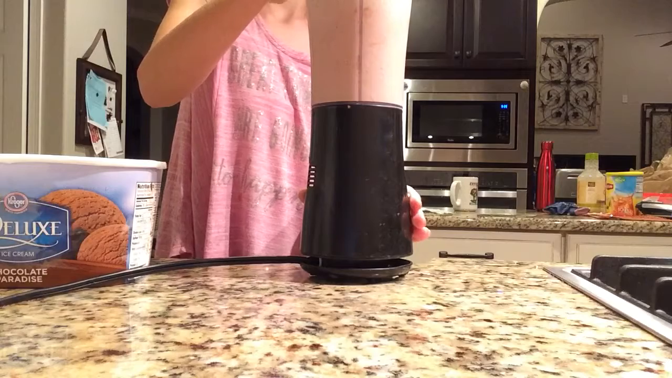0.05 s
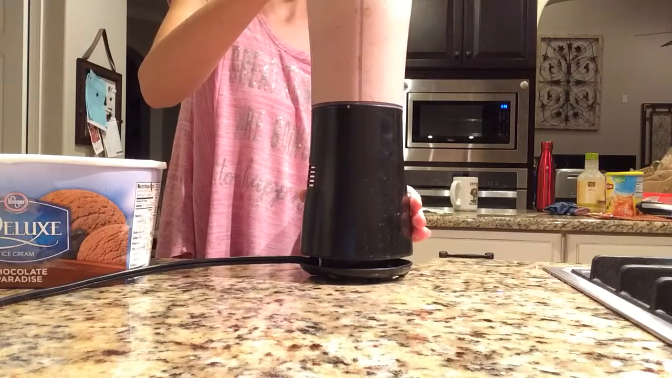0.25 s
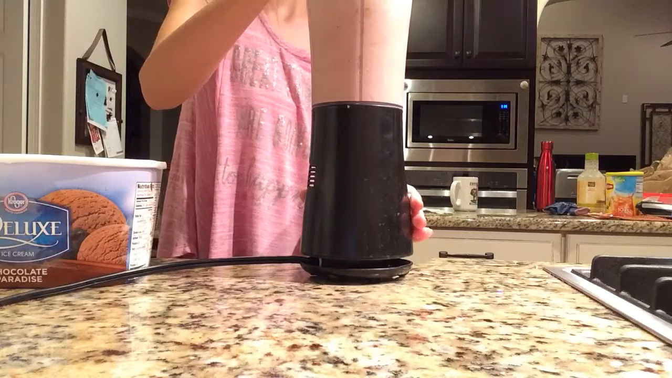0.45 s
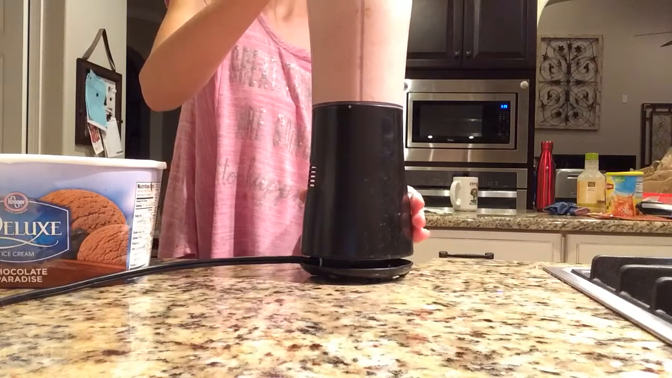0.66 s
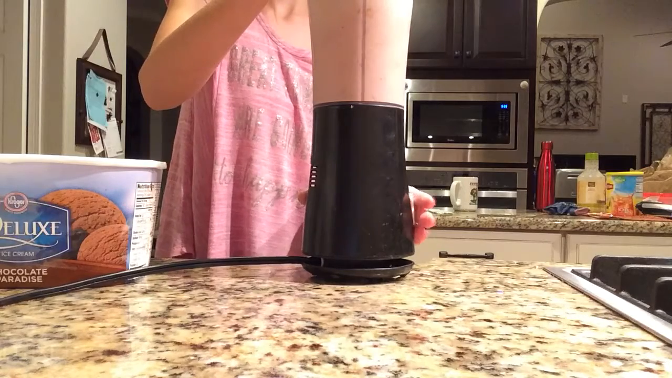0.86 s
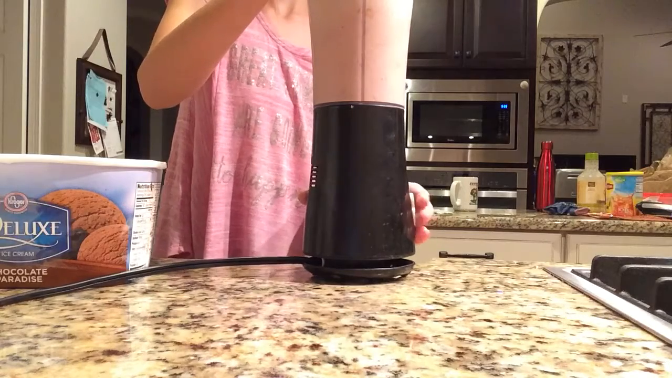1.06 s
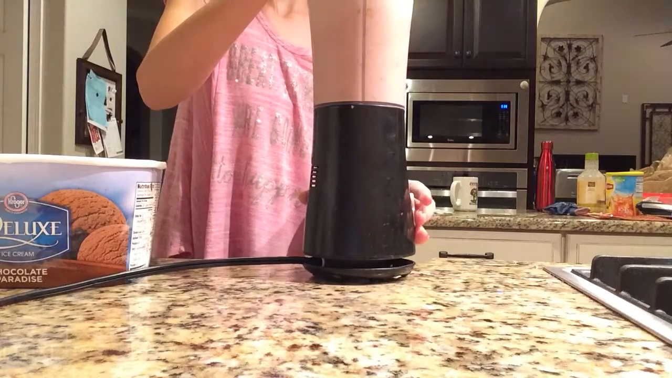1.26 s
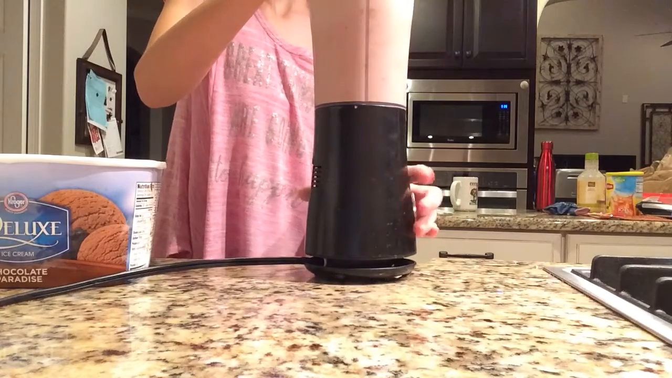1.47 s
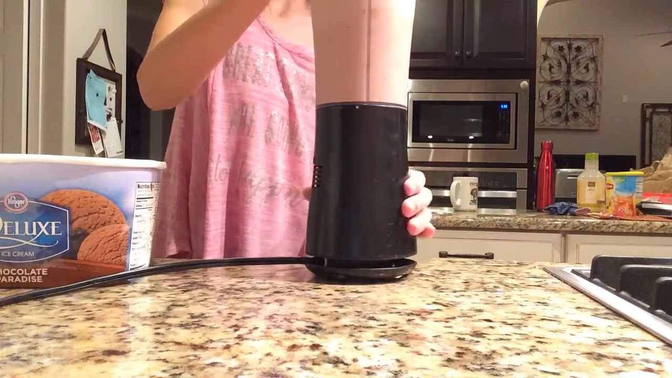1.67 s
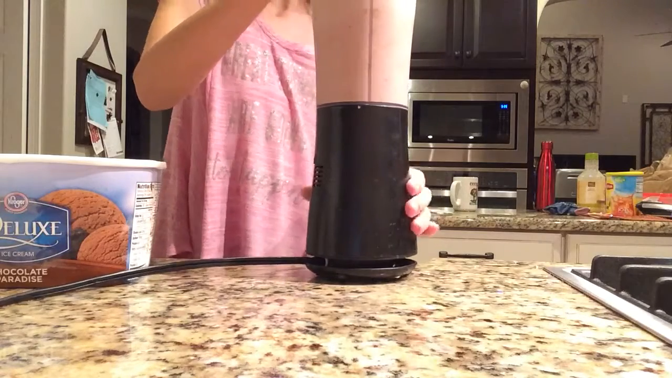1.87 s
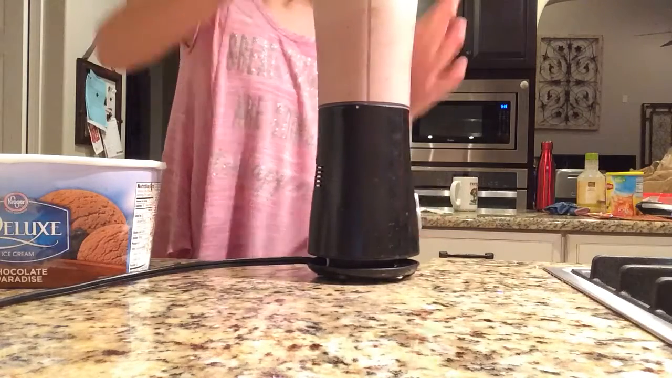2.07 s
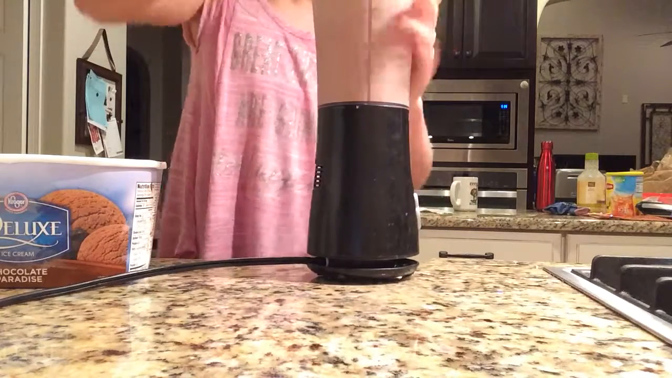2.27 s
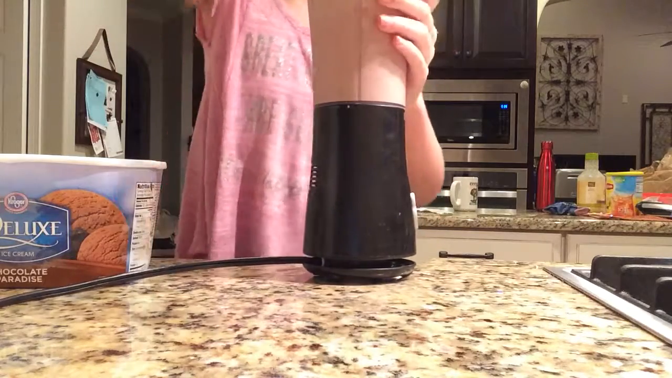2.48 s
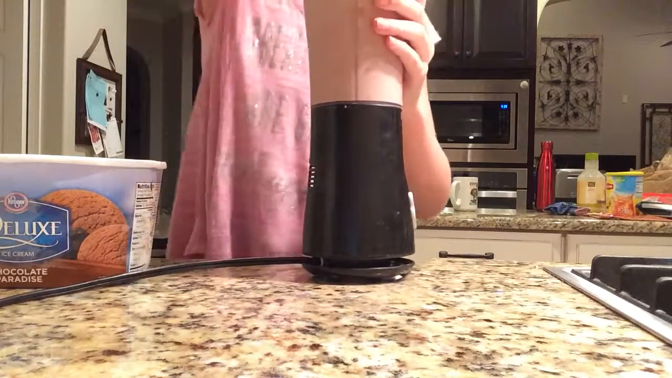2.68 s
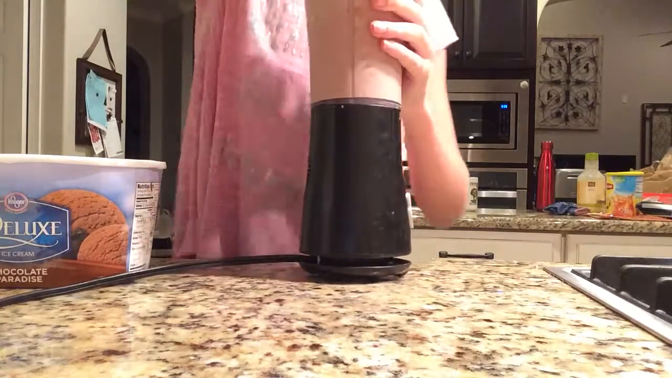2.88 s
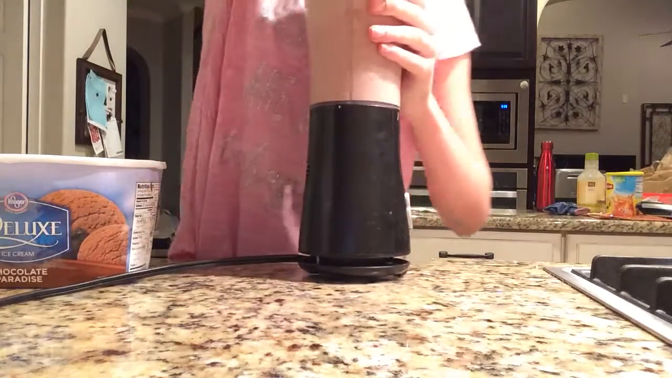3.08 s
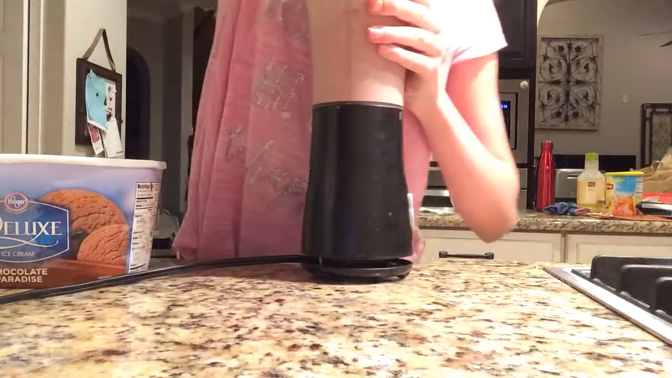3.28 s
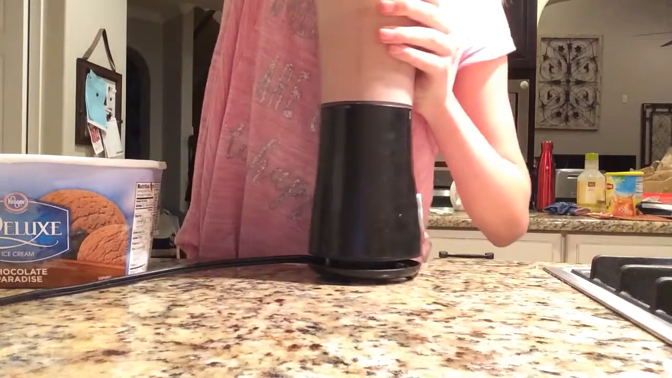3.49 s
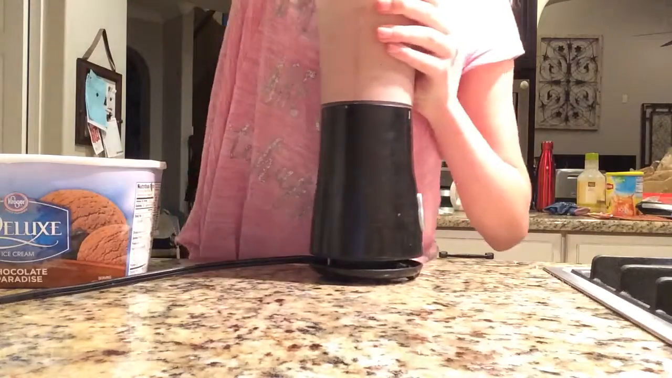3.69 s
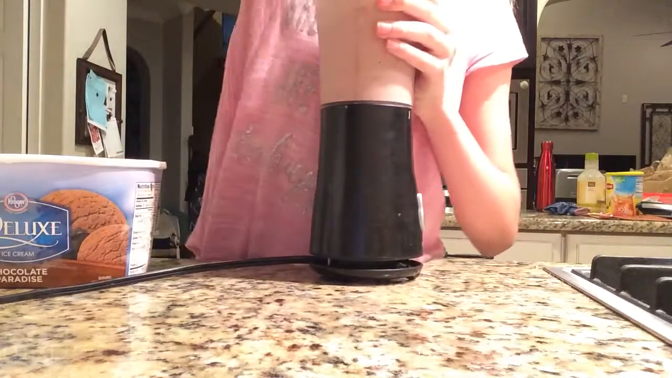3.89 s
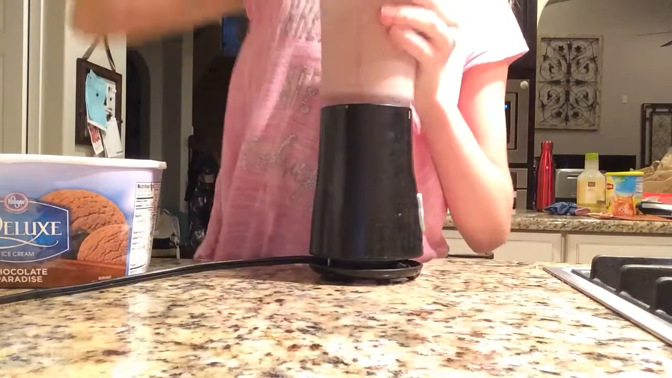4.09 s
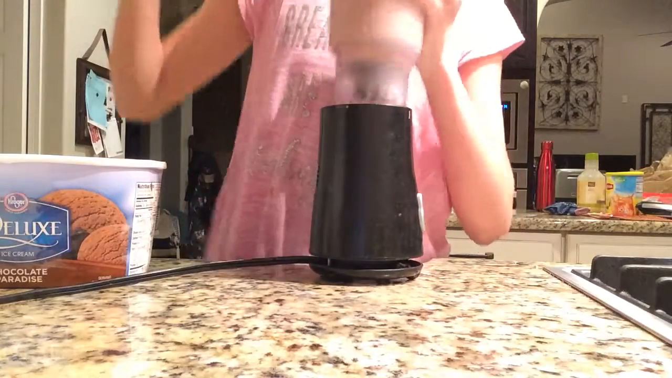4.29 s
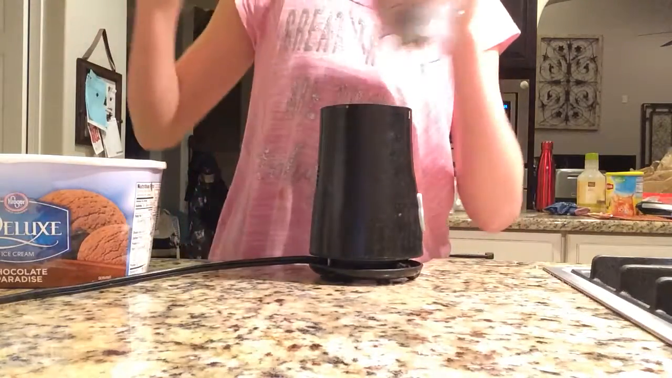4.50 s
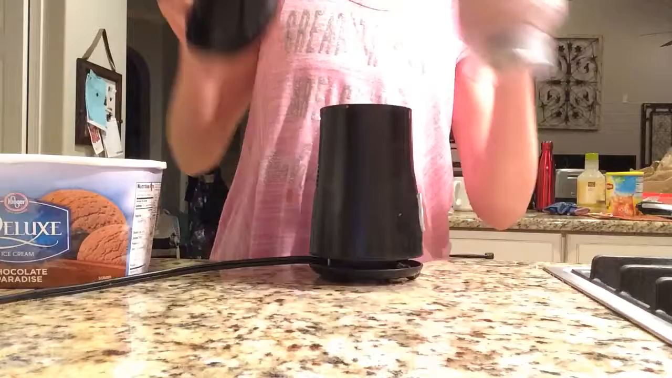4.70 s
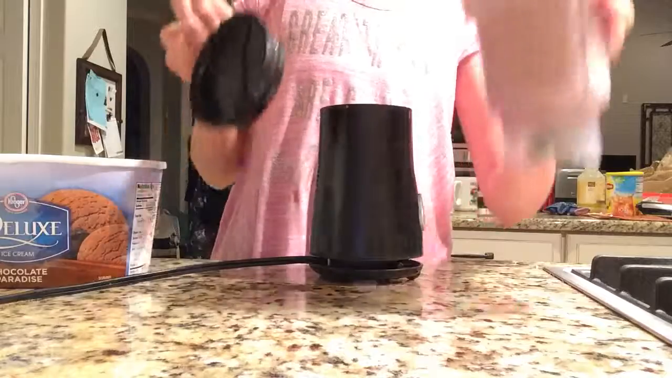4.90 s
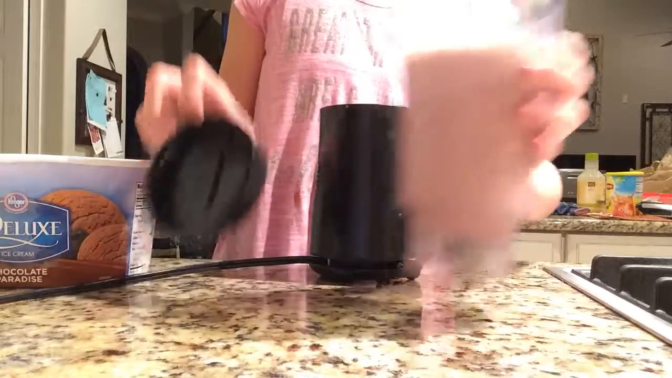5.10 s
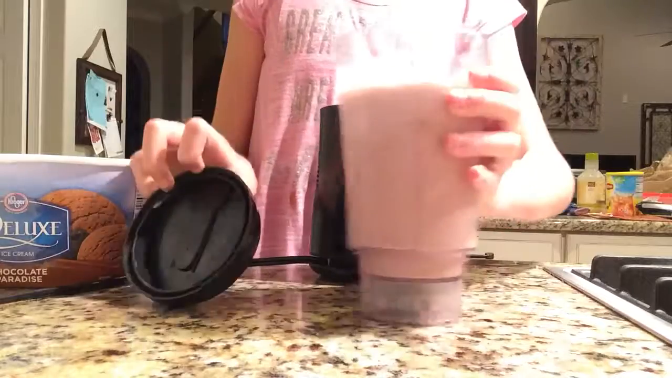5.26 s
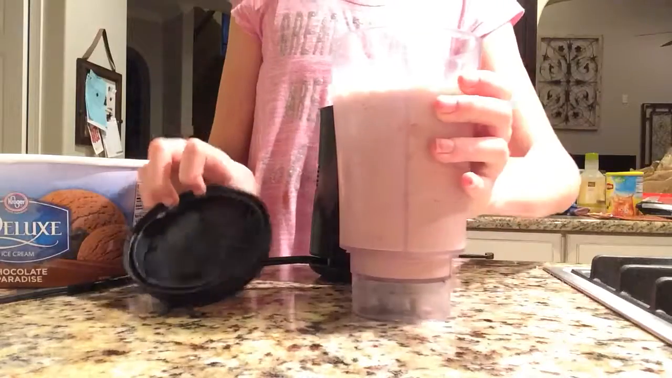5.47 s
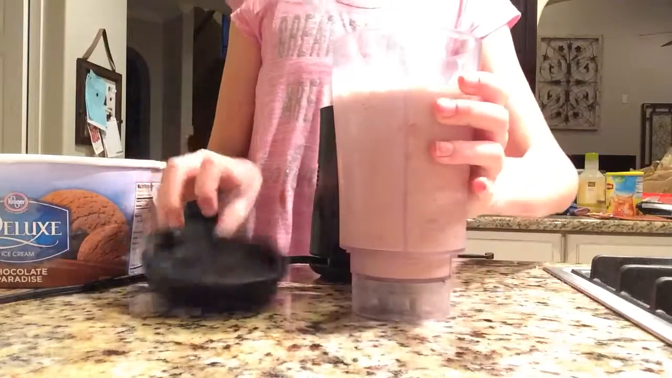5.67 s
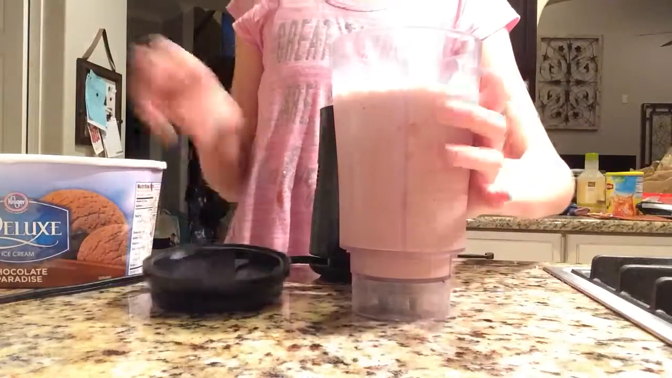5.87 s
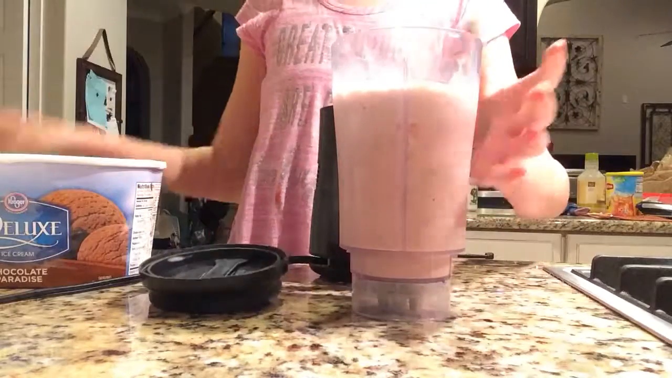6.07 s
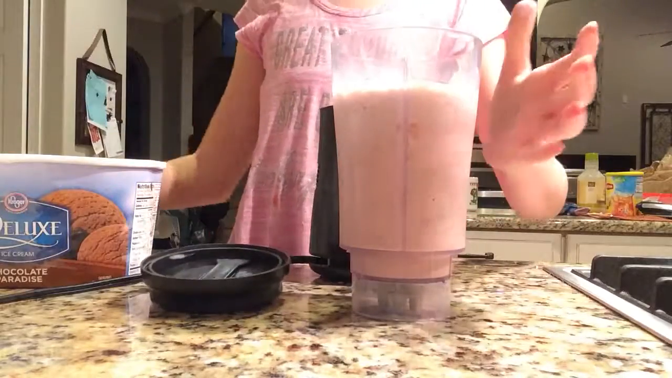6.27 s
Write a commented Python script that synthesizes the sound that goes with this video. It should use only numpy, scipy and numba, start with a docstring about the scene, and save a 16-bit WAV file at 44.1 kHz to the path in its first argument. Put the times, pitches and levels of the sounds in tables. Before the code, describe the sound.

A small blender whirs and winds down while a dog barks in another room, then a plastic cup is twisted off and set down.

```python
"""Blending a drink

A small blender whirs on a stone kitchen counter, is switched off and coasts to a ticking stop.
Its spinning shaft sets the pitch of its hum and whine. A dog barks steadily in another room.
The full plastic cup is twisted off the base and its blade lid is pulled free with a snap.
Cup and lid are set down close by; each knock is a mix of fading tones and short bursts of noise."""
import sys
import numpy as np
from scipy import signal
from scipy.fft import rfft, irfft
from scipy.io import wavfile
from scipy.ndimage import uniform_filter1d
from numba import njit

SR = 44100
rng = np.random.default_rng(int(sys.argv[2]) if len(sys.argv) > 2 else 0)


def inscribe(sig):
    """Save sig as 16-bit PCM at rate SR to the path in sys.argv[1].

    A 1-D sig is mono; a 2-D sig holds one channel per row.
    Samples are clipped to [-1, 1] before scaling.
    """
    pcm = np.round(np.clip(np.atleast_2d(sig).T, -1, 1) * 32767)
    wavfile.write(sys.argv[1], SR, pcm.astype(np.int16))


N = 279594
TIME = np.arange(N) / SR
POWER_OFF_S, STOP_S = 0.793, 2.13
MAINS_HZ, TOP_HZ = 60, 15500  # wall current; highest sound kept
POWERED = np.clip((POWER_OFF_S - TIME) / 0.05493 + 1, 0, 1)  # 1 while on, 0 once off
SURGE_PHASE = 2 * np.pi * 2 * MAINS_HZ * TIME  # the current surges twice per cycle


def undb(db):
    """Turn decibels into a gain."""
    return 10 ** (np.asarray(db) / 20)


def unit(x):
    """Scale to an average (rms) level of 1."""
    return x / np.sqrt(np.mean(x ** 2) + 1e-20)


def clock(size=N):
    """Time of each sample in seconds."""
    return np.arange(size) / SR


def response(points, hz):
    """Read the gain at hz from a list of (f/Hz, level/dB) points."""
    f, db = np.transpose(points)
    return undb(np.interp(np.log(np.maximum(hz, 1)), np.log(f), db))


def noise(points, size=N):
    """Noise of level 1, shaped by (f/Hz, level/dB) points."""
    gains = response(points, np.fft.rfftfreq(size, 1 / SR))
    return unit(irfft(rfft(rng.standard_normal(size)) * gains, size))


def resonate(x, hz, width):
    """Keep a band around hz; filtering twice makes its sides steeper."""
    b, a = signal.iirpeak(hz, hz / width, fs=SR)
    return signal.lfilter(b, a, signal.lfilter(b, a, x))


@njit
def sweep(x, hz, width):
    """Keep a band whose centre moves."""
    y, band_state, low_state = np.empty(len(x)), 0., 0.
    for i in range(len(x)):
        step, damping = np.tan(np.pi * hz[i] / SR), width / hz[i]
        band = (band_state + step * (x[i] - low_state)) / (1 + step * (step + damping))
        band_state = 2 * band - band_state
        low_state += 2 * step * band
        y[i] = damping * band
    return y


def walk(rate, size=N):
    """Wander randomly by about 1, turning rate times a second."""
    hold = max(int(SR / rate), 1)
    steps = np.repeat(rng.standard_normal(size // hold + 1), hold)
    return 1.3 * uniform_filter1d(steps, hold)[:size]


def fade(t, t60):
    """Die away by 60 dB in t60 seconds."""
    return np.exp(-np.log(1000) * t / t60)


def ring(tones, detune=0.):
    """The fading tones of a struck thing; detune shifts them, as if hit in a new spot."""
    t = clock(SR // 2)
    out = np.zeros(len(t))
    for k, (hz, db, t60) in enumerate(tones):
        hz *= 1 + detune * rng.standard_normal()
        out += (-1) ** k * undb(db) * fade(t, t60) * np.sin(2 * np.pi * hz * t)
    return out


def burst(points, t60, rise=0.00081):
    """A hit with so many tones that they blur into noise; it builds up, then fades."""
    t = clock(SR // 2)
    return noise(points, len(t)) * fade(t, t60) * (1 - np.exp(-t / rise))


def blow(x, db):
    """Set the level of the first 15 ms of a hit."""
    return x * undb(db) / np.sqrt(np.mean(x[:int(.015 * SR)] ** 2))


def swell(peak_s, length_s):
    """A smooth rise and fall in level."""
    return np.exp(-(2 * (TIME - peak_s) / length_s) ** 2)


def add(out, s, x):
    """Mix x into out from time s."""
    i = int(s * SR)
    out[i:i + len(x)] += x[:N - i]


def room(x, wet_db, t60_low=0.57, t60_high=0.31):
    """Cabinets and tiles echo after a few ms; the treble dies first."""
    t = clock(SR * 3 // 4)
    hiss = rng.standard_normal(len(t))
    low = signal.sosfilt(signal.butter(1, 1500, fs=SR, output="sos"), hiss)
    tail = low * fade(t, t60_low) + (hiss - low) * fade(t, t60_high)
    tail *= np.clip(t / 0.0024 - 1, 0, 1)
    return x + undb(wet_db) * signal.fftconvolve(x, tail / np.linalg.norm(tail))[:N]


# The air in the room: f/Hz, level/dB
ROOM_AIR = [(15, -55.5), (25, -21), (91, -3), (140, -5.5), (164, -10.5), (274, -10), (368, -17), (567, -4),
            (648, -16), (1050, -20), (1450, -25), (2490, -17.5), (2700, -21.5), (4260, -22), (15500, -26)]
# An appliance droning in the background: f/Hz, width/Hz, level/dB
DRONE_BANDS = [(101.4, 38, -55), (133.4, 12, -59), (271.2, 28, -61), (489, 59, -63), (585, 68, -60.5),
               (1222, 86, -66), (2440, 360, -70)]
def kitchen():
    """Steady air and the narrow, wavering drone of an appliance."""
    drone = sum(undb(db) * unit(resonate(rng.standard_normal(N), hz, width))
                for hz, width, db in DRONE_BANDS)
    return noise(ROOM_AIR) * undb(-48.5 + 0.34 * walk(6)) + drone


# The powered shaft slows as the blades bite, then picks up: t/s, speed/Hz
DRIVEN_SPEED = [(0.0, 408.3), (0.164, 408.0), (0.368, 404.5), (0.432, 393.7), (0.456, 380.6), (0.5, 371.7),
                (0.67, 384.2), (0.76, 388.2), (0.79, 386.0)]
def shaft_speed():
    """Turns per second: held up by the current, then braked by friction and by the drink."""
    friction_hz_per_s, drag_hz, drag_s = 218, 45, .19
    driven = np.interp(TIME, *np.transpose(DRIVEN_SPEED))
    coasted_s = np.maximum(TIME - POWER_OFF_S, 0)
    drag = drag_hz * (1 - np.exp(-coasted_s / drag_s))
    return np.maximum(driven - friction_hz_per_s * coasted_s - drag, 20)


def halvings(hz):
    """How many times the shaft has halved its full speed of 400 turns a second."""
    return np.log2(400 / hz)


def harmonic(angle, k, ripple, rough):
    """A tone at k times the shaft speed; it ripples with the current and is rougher without it."""
    a, b, c = rng.uniform(0, 2 * np.pi, 3)
    surges = np.sin(SURGE_PHASE + b) + ripple / 2 * np.sin(2 * SURGE_PHASE + c)
    flicker = 1 + rough * (1 - 0.73 * POWERED) * walk(69.97)
    return np.sqrt(2) * np.sin(k * angle + a) * (1 + ripple * POWERED * surges) * flicker


# How strongly the base shakes on its feet: f/Hz, level/dB
FEET_SHAKE = [(100, -30), (175, -23), (215, -11.5), (265, -27), (350, -9), (375, -5.5), (408, 0)]
# How well the cup wall passes on each pitch: f/Hz, level/dB
CUP_WALL_GAIN = [(250, 2), (370, -7), (520, 0), (660, -7), (720, 1), (770, 0), (850, -9), (970, 2),
                 (1060, -6), (1115, -17), (1160, 3), (1205, 3), (1225, 7)]
def hum(hz, angle):
    """The off-balance shaft shakes the base, and the cup sounds its next two harmonics."""
    shake = undb(-21) * response(FEET_SHAKE, hz) * harmonic(angle, 1, ripple=0.045, rough=0.0659)
    for k, db, fall_db, ripple, rough in [(2, -31.3, 7.5, 0.14, .4), (3, -30.4, 12.5, 0.08, 0.35)]:
        gain = undb(db - fall_db * halvings(hz)) * response(CUP_WALL_GAIN, k * hz)
        shake += gain * harmonic(angle, k, ripple, rough)
    bearing_shape = [(300, -2), (650, -2), (1100, -15), (1600, -4.5)]
    bearings = sum(harmonic(angle, k, ripple=0, rough=0.27) * response(bearing_shape, k * hz)
                   for k in range(4, 7))
    poles = np.sin(2 * angle + SURGE_PHASE)  # two magnet poles beat with the current
    return shake + undb(-44) * (1 - POWERED) * bearings + undb(-39) * POWERED * poles


# How well the motor case passes on each pitch: f/Hz, level/dB
CASE_GAIN = [(300, -10), (700, -7), (1400, -28), (1550, -7), (1595, -10), (1630, 0), (2000, 1.5),
             (2400, -0.5), (2800, -16.5), (3250, -12), (3700, -16.5), (4100, -14), (4500, -18.5),
             (5150, -11), (5700, -23), (7500, -21)]
def whine(hz, angle):
    """High harmonics sound through the case; they sink as the power is cut and the shaft slows."""
    panel_hz, panel_width_hz, panel_db = 1935, 50, 5.5  # the case rings sharply here
    tones = np.zeros(N)
    for k in range(4, 19):
        flare = undb(panel_db / (1 + (2 * (k * hz - panel_hz) / panel_width_hz) ** 2))
        buzz = min(0.24 * (k - 3.4), .95)
        tones += response(CASE_GAIN, k * hz) * flare * harmonic(angle, k, ripple=buzz, rough=0.71)
    slowed = np.maximum(halvings(hz) - .055, 0)
    return tones * undb(-32.2 - 21 * slowed - 6.2 * (1 - POWERED))


# The case's high peaks and dips, which the whistle slides through: f/Hz, level/dB
WHISTLE_GAIN = [(2500, -3), (3200, -2), (3850, 3), (4200, -10), (4700, 2), (5300, 3), (6300, 0), (6700, -7),
                (7400, 4), (8200, 2), (9000, 1), (10500, -12), (11600, 3), (12250, -6), (13200, 6),
                (15000, -4)]
def whistle(hz, angle):
    """Ten contact bars on the shaft whistle past the brushes that feed them current."""
    tones = sum(harmonic(angle, k, ripple=0.54, rough=0.7)
                * (k * hz < TOP_HZ) * response(WHISTLE_GAIN, k * hz) for k in range(10, 80, 10))
    return tones * undb(-52.5 - 6.5 * halvings(hz) - 3 * POWERED)


# The hiss of brushes and cooling air: f/Hz, level/dB
HISS_SHAPE = [(40, -27), (110, -13), (170, -6), (400, 3.5), (650, 13.5), (1100, -6), (1480, 7), (2100, 9),
              (2700, 5.5), (5200, 4), (6700, -0.5), (9000, 2), (15000, -2.5)]
def brush_hiss(hz, angle):
    """Brushes scrape hardest once a turn; the lower rush of air falls away with the speed."""
    scrape = 1 + 0.19 * np.cos(angle) + 0.12 * POWERED * np.sin(SURGE_PHASE)
    hiss = noise(HISS_SHAPE) * scrape * undb(1.1 * walk(26.12))
    bright = signal.sosfilt(signal.butter(1, 6000, "high", fs=SR, output="sos"), hiss)
    rush = np.clip(hz / 420, 0, 1) ** 0.99 * (hiss - bright)
    return (bright + rush) * undb(-32.8 - 5.8 * halvings(hz))


def churn(hz):
    """The thick drink sloshes in the cup, more softly at low speed."""
    slosh = noise([(40, -11), (110, -5.5), (200, -22), (520, 5), (750, -5), (1200, -10), (4000, -33)])
    return slosh * undb(3.4 * walk(20) - 41) * np.clip(hz / 270, 0, 1)


# The ringing tones of the motor base: f/Hz, level/dB, fade/s
BASE_TONES = [(517.5, -3, 0.058), (780, -4.5, 0.022), (1360, -3, 0.019), (1850, -1.5, 0.035),
              (2142, -0.5, 0.031), (2387, -2.5, 0.0264), (4670, -4.5, 0.017), (5160, -6, 0.01431),
              (5840, -9.5, .012), (7176, -22.5, 0.016)]
# Last ticks as the joint between motor and blades settles: t/s, level/dB
LAST_TICKS = [(2.137, -36.5), (2.179, -37.5)]
def rattle(hz, turns):
    """The loose joint knocks and rubs once a turn; at high speed it tightens to a faint tick."""
    loose_db, tight_db, loose_hz, tighten_db_per_hz = -38, -62, 94, .19
    tick_db = np.maximum(loose_db - tighten_db_per_hz * np.maximum(hz - loose_hz, 0), tight_db)
    new_turn = np.diff(np.floor(turns), prepend=np.floor(turns[0]))
    ticks = new_turn * undb(tick_db + .7 * walk(150)) * (TIME < STOP_S)
    for s, db in LAST_TICKS:
        ticks[int(s * SR)] += undb(db)
    rubs = signal.fftconvolve(ticks, fade(clock(SR // 20), t60=0.035))[:N]
    rubs *= noise([(200, -2), (2200, 1), (7000, -3), (12000, -18)])
    base = ring(BASE_TONES)
    knocks = signal.fftconvolve(ticks, blow(base, db=0))[:N]
    ringing_rubs = signal.fftconvolve(rubs, base / np.linalg.norm(base))[:N]
    return undb(-2) * knocks + undb(-2.5) * ringing_rubs + undb(-3) * rubs


def motor():
    """One spinning shaft drives the tones, hiss, churning and rattle."""
    hz = shaft_speed()
    wobble = np.where(TIME < POWER_OFF_S, .0005, .002)  # the drink jostles the shaft
    turns = np.cumsum(hz * (1 + wobble * walk(60))) / SR
    turns -= np.interp(LAST_TICKS[0][0], TIME, turns)  # a turn ends just as the joint settles
    angle = 2 * np.pi * turns
    humming = np.clip((STOP_S - TIME) / 0.23, 0, 1)
    spinning = np.clip((STOP_S - TIME) / 0.054 + 1, 0, 1)
    tones = hum(hz, angle) + whine(hz, angle) + whistle(hz, angle)
    hiss = spinning * brush_hiss(hz, angle)
    return humming * (tones + churn(hz)) + hiss + room(rattle(hz, turns), wet_db=-7)


# Barks, timed at their loudest: t/s, length/s, pitch/Hz, level/dB, mouth tone/Hz
DOG_BARKS = [(.41, .08, 298, -36, 970), (.857, .12, 309, -37, 950), (1.33, .12, 281, -34, 1010),
             (1.784, .11, 280, -33, 990), (2.262, .112, 353, -30.5, 1020), (2.735, .097, 290, -33.5, 1086),
             (3.19, .1, 285, -35, 1300)]
# The bands that the dog's throat lets through: f/Hz, width/Hz, level/dB
THROAT_BANDS = [(247, 105, 1.5), (430, 160, -7), (708, 210, -0.5), (1310, 180, -17), (1726, 84, -10),
                (3300, 1400, -18), (5500, 3000, -26)]
def dog():
    """Hoarse barks: uneven pulses and breath pass through a mouth that opens and closes."""
    out, size = np.zeros(N), SR // 3
    boom_shape = [(50, -25), (110, -1), (160, -10), (215, 0), (275, 0), (340, -14), (900, -45)]
    for s, length, pitch, db, mouth_hz in DOG_BARKS:
        from_middle = (clock(size) - size / SR / 2) / length
        closing = np.minimum(4 * from_middle ** 2, 1.5)
        hz = pitch * (1 - .1 * closing) * (1 + .045 * walk(250, size))
        cycles = np.cumsum(hz) / SR
        pulses = unit(np.diff(np.floor(cycles), prepend=0) - hz / SR) * undb(2.5 * walk(199.2, size))
        breath = unit(rng.standard_normal(size) * np.exp(-(cycles % 1) / 0.48))
        source = pulses + 1.05 * breath
        mouth = mouth_hz * (1.04 - 0.082 * closing)
        voice = undb(2.0) * sweep(sweep(source, mouth, 325.0), mouth, 325.0)
        voice += sum(undb(gain) * resonate(source, f, width) for f, width, gain in THROAT_BANDS)
        voice = unit(voice) + undb(-5) * noise(boom_shape, size)  # the walls boom along
        loudness = undb(db + 0.9 * walk(90.6, size)) * np.exp(-np.abs(2 * from_middle) ** 3.8)
        add(out, s - size / SR / 2, voice * loudness)
    return out


def bite():
    """The two blades hit a thick lump and chop out a short rasp."""
    chop = 1 + .6 * np.cos(2 * np.pi * 2 * np.cumsum(shaft_speed()) / SR)
    rasp = noise([(300, -22), (1400, -24), (1930, 3), (2150, -1), (2400, -4), (2800, -14),
                  (4100, -17), (8000, -27), (15000, -36)])
    return rasp * chop * swell(peak_s=.438, length_s=.07) * undb(-27.5)


def slump():
    """As the blades slow, the whirling drink falls back with a low rumble."""
    rumble = noise([(25, -6), (60, -4), (100, 2), (150, -8), (300, -22), (1000, -45)])
    return rumble * swell(peak_s=1.17, length_s=.3) * undb(-44)


# The cup's tabs slip in the base: t/s, thud/dB, clack/dB, tick/dB
TAB_SLIPS = [(3.105, -47, -55, -65), (3.188, -39, -52, -60), (3.213, -17.3, -28.3, -37.2),
             (3.415, -30, -55, -56.5), (3.425, -31, -54, -40.5), (3.432, -30, -41, -53.5),
             (4.21, -41, -47, -64)]
# The tones of cup and base locked together: f/Hz, level/dB, fade/s
LOCKED_TONES = [(93, -6, 0.22), (133, 0, 0.11), (209, -15, 0.13), (287, 0, 0.084), (463, -2.5, 0.042),
                (613, -1, 0.059), (726, 0.5, 0.033), (980.94, -8.5, 0.055), (1280, -20.5, .05)]
# A dull thud of the cup: f/Hz, level/dB
THUD_SHAPE = [(30, -18), (75, 4), (170, 9), (400, 6), (650, 5), (1100, -28), (2000, -35)]
# A bright tick of plastic: f/Hz, level/dB
TICK_SHAPE = [(700, -46), (1500, -13), (3000, -2.5), (4800, -3), (6100, 3.5), (7000, -0.5), (8300, 3.5),
              (11000, 1.5), (15000, -7.5)]
def twists():
    """The cup is twisted loose: it thuds together with the base, and the plastic clacks and ticks."""
    out = np.zeros(N)
    tab_shape = [(500, -18), (1200, 12), (2500, 0.5), (4300, -1), (5300, 7), (6500, -5), (15000, -28.5)]
    for s, thud_db, clack_db, tick_db in TAB_SLIPS:
        add(out, s, blow(ring(LOCKED_TONES, detune=0.0165), thud_db - 1.2))
        add(out, s, blow(burst(THUD_SHAPE, t60=0.054), thud_db))
        add(out, s, blow(burst(tab_shape, t60=0.039), clack_db))
        add(out, s, blow(burst(TICK_SHAPE, t60=0.042), tick_db))
    return out


def bubble():
    """A bubble in the drink rings with a short, rising note."""
    out, t, start_hz = np.zeros(N), clock(SR // 2), 638
    note = np.sin(2 * np.pi * start_hz * (t + 2 * t ** 2))
    glug = note * fade(t, t60=0.061) * (1 - np.exp(-t / 0.0063))
    add(out, s=3.444, x=blow(glug, db=-32.5))
    return out


# The cup scraping on the base: f/Hz, level/dB
SCRAPE_SHAPE = [(60, -10.5), (220, 3), (600, 1.5), (1150, -0.5), (1450, -9), (1700, 4), (2000, -19),
                (3200, -11.5), (6000, -24), (15000, -25)]
def lift():
    """The cup grates briefly as it leaves the base."""
    out = np.zeros(N)
    scrape = burst(SCRAPE_SHAPE, t60=0.18, rise=.003) * undb(2 * walk(303, SR // 2))
    add(out, s=4.3, x=blow(scrape, db=-32))
    return out


# Plastic edges snap past each other: t/s, level/dB, body/dB
EDGE_SNAPS = [(4.471, -41, -45.5), (4.796, -21, -59), (5.412, -35, -35), (5.519, -40.5, -38.5)]
# The tones of the snapping edge: f/Hz, level/dB, fade/s
EDGE_TONES = [(2700, -9, .12), (5760, -3, .13), (6150, 0, .17), (7910, -3, .12), (8360, -2, .13),
              (9540, -4, .11), (10500, -5, .1)]
# A clack of the cup's rim: f/Hz, level/dB
CLACK_SHAPE = [(500, 1), (1000, 11), (1800, 2), (3300, 5), (5200, -2), (6500, -38), (15000, -44)]
def snaps():
    """Bright snaps: a thin edge rings, with some of the plastic body behind it."""
    out = np.zeros(N)
    for s, db, body_db in EDGE_SNAPS:
        add(out, s, blow(burst(TICK_SHAPE, t60=0.087, rise=.0013), db - 1))
        add(out, s, blow(ring(EDGE_TONES, detune=.004), db - 9))
        add(out, s, blow(burst(CLACK_SHAPE, t60=0.07), body_db))
    return out


# The tones of the full cup on the counter: f/Hz, level/dB, fade/s
CUP_TONES = [(62, -10.5, 0.16), (87, -4, 0.1377), (127, -7.5, 0.21), (164, -16, .14), (215, -4, 0.17),
             (283, -12, 0.15), (380, 1, 0.15), (486, -1, 0.09), (604, -4, 0.049), (777, -6.5, .04),
             (965, -15, 0.036)]
# The cup lands and rocks: t/s, thud/dB, clack/dB, tick/dB
CUP_KNOCKS = [(5.2925, -16, -25, -55), (5.302, -23, -30, -50), (5.328, -34, -29.5, -39),
              (5.334, -39, -36.5, -39), (5.348, -36, -34, -43), (5.372, -36, -55, -57),
              (5.414, -26, -39, -34.5), (5.422, -33, -43, -39)]
def cup():
    """The heavy cup lands on the stone with a low ring, then rocks on its hard rim."""
    out = np.zeros(N)
    add(out, s=5.293, x=blow(ring(CUP_TONES), db=-12))
    for s, thud_db, clack_db, tick_db in CUP_KNOCKS:
        add(out, s, blow(burst(THUD_SHAPE, t60=0.13), thud_db))
        add(out, s, blow(burst(CLACK_SHAPE, t60=0.064, rise=0.00065), clack_db))
        add(out, s, blow(burst(TICK_SHAPE, t60=0.059), tick_db))
    return out


# The blade lid lands and rocks: t/s, ring/dB, tick/dB
LID_KNOCKS = [(5.751, -24.5, -28), (5.775, -32, -53.5), (5.787, -34, -32), (5.798, -33.5, -62),
              (5.861, -51.5, -46.5), (5.882, -38.5, -65)]
# The tones of the lid: f/Hz, level/dB, fade/s
LID_TONES = [(594, -5.5, 0.05), (786.24, -12, 0.11), (1144, -5, 0.031), (1286, -0.5, 0.047),
             (1500, -6.5, 0.04394), (1620, -1.5, 0.044), (1762, -1, 0.063), (1940, -7, .04),
             (2290, -28, .045), (2680, -16, .04), (4330, -8, 0.0241), (5500, -12, 0.041)]
# The noisy knock of the lid's body: f/Hz, level/dB
LID_SHAPE = [(40, -9), (85, 2), (200, -17.5), (600, -1), (1000, -8.5), (1700, 4.5), (2800, 1.5),
             (4000, -33.5)]
def lid():
    """The light lid rings higher than the cup and rocks to rest."""
    out = np.zeros(N)
    tick_shape = [(2500, -6), (4400, 1.5), (6300, -2.5), (7500, -2), (11000, -8), (15000, -15.5)]
    for s, ring_db, tick_db in LID_KNOCKS:
        add(out, s, blow(ring(LID_TONES, detune=0.017), ring_db))
        add(out, s, blow(burst(LID_SHAPE, t60=0.047), ring_db))
        add(out, s, blow(burst(tick_shape, t60=0.0344), tick_db))
    return out


def scene():
    """Blender and cup are near; the distant dog gets more of the room's echo."""
    blender = room(motor() + bite() + slump(), wet_db=-20)
    handling = room(twists() + bubble() + lift() + cup() + lid(), wet_db=-13.5, t60_low=0.49)
    handling += room(snaps(), wet_db=-8)
    barking = room(dog(), wet_db=-6.5, t60_low=0.33)
    return (blender + handling + barking + kitchen())[None]


def record(dry):
    """The microphone drops the deep bass, clips the peaks and cuts the highest treble."""
    thin = signal.sosfilt(signal.butter(2, 42, "high", fs=SR, output="sos"), dry)
    return signal.sosfilt(signal.ellip(10, .2, 70, TOP_HZ, fs=SR, output="sos"), np.clip(thin, -1, 1))


dry = scene()
out = record(dry)
inscribe(out)
```